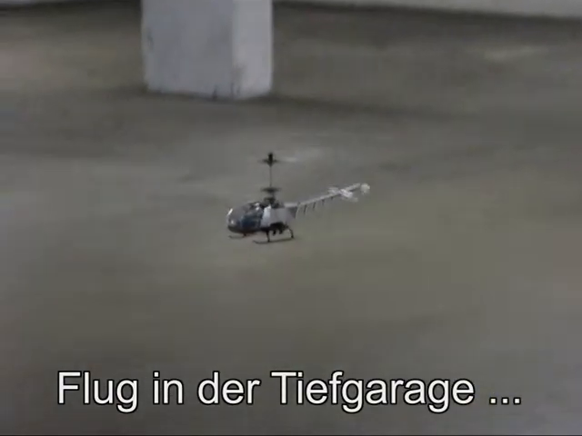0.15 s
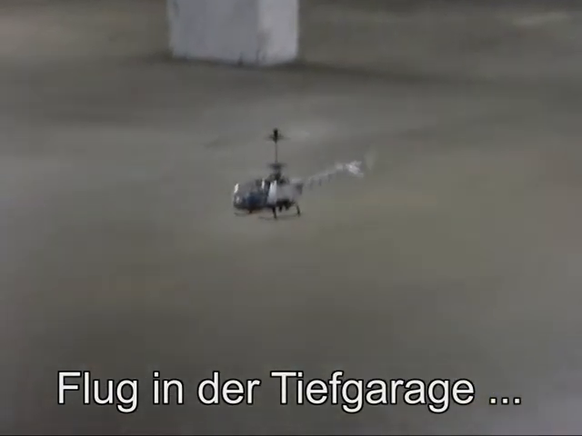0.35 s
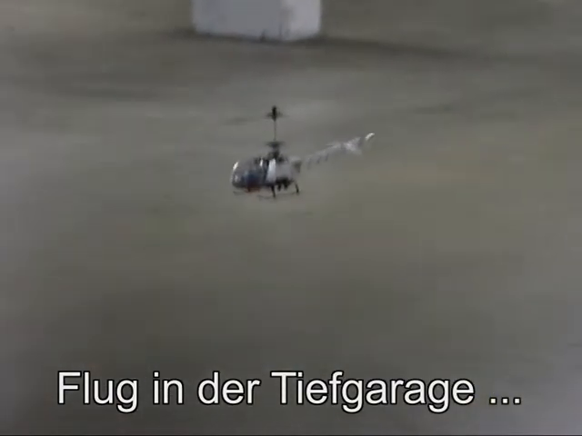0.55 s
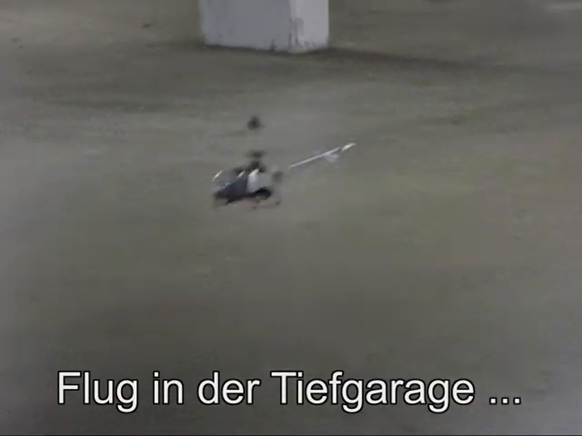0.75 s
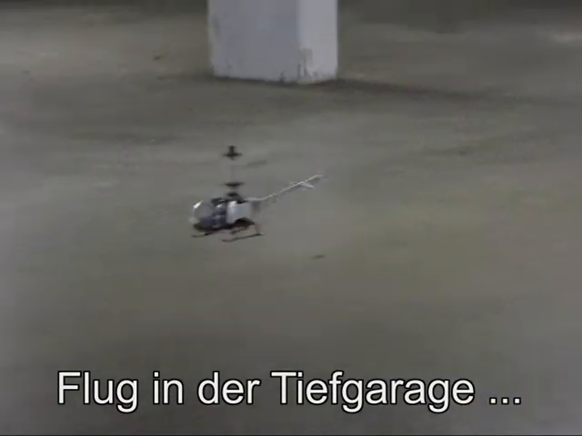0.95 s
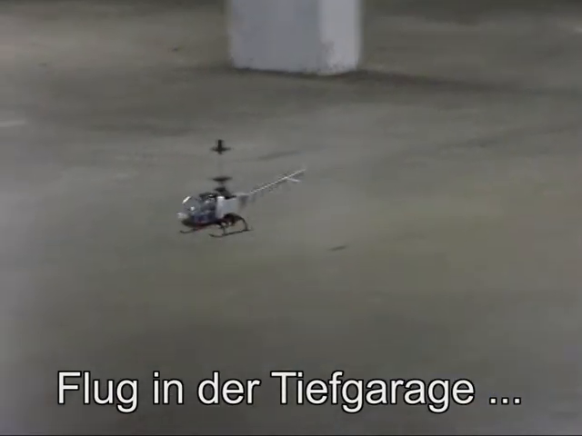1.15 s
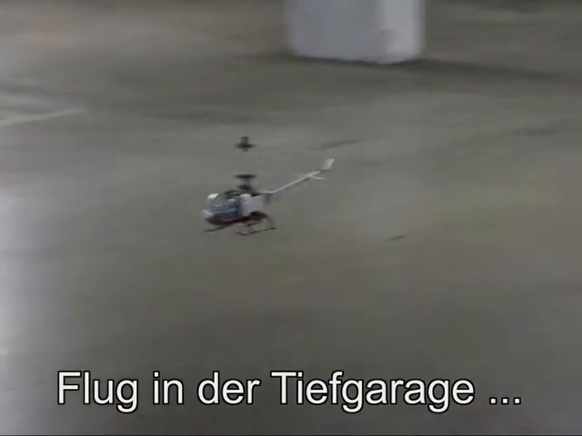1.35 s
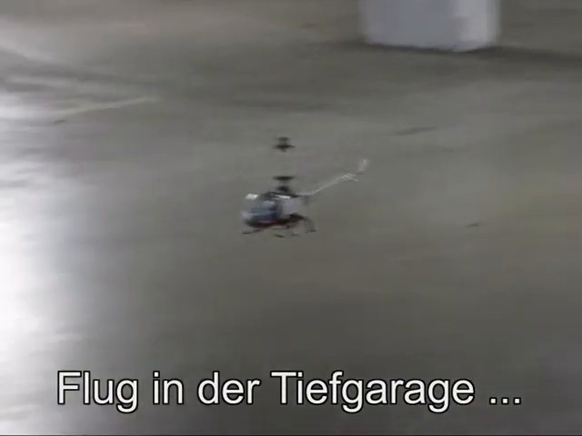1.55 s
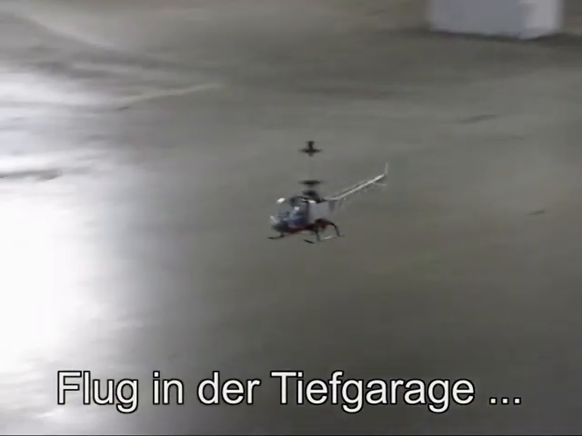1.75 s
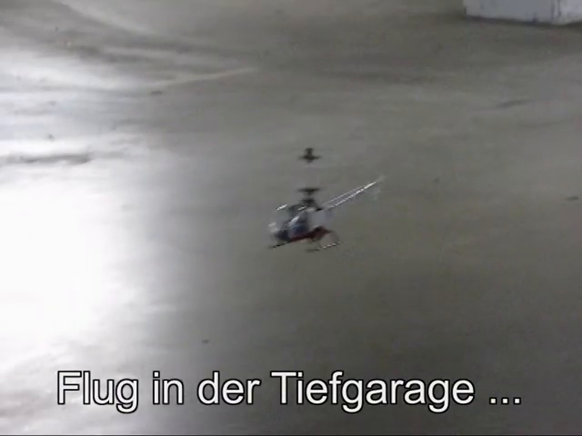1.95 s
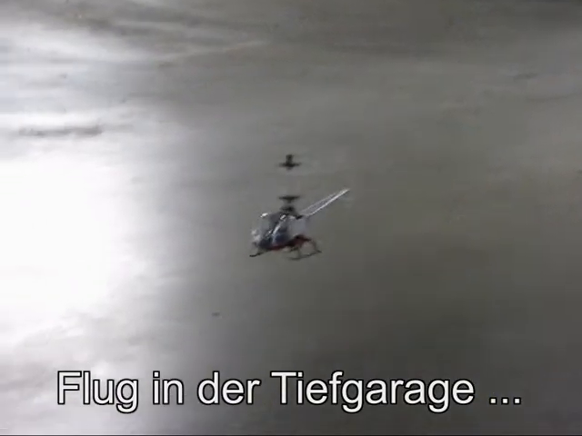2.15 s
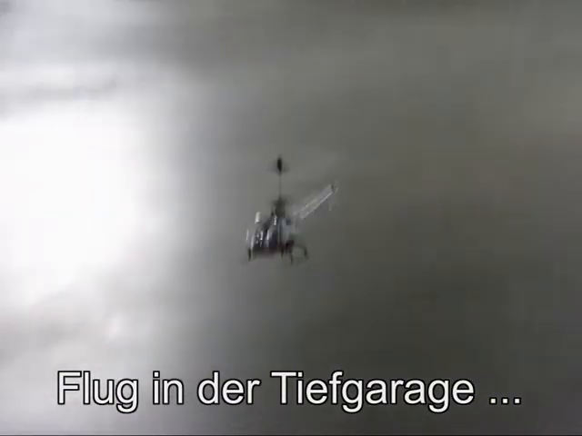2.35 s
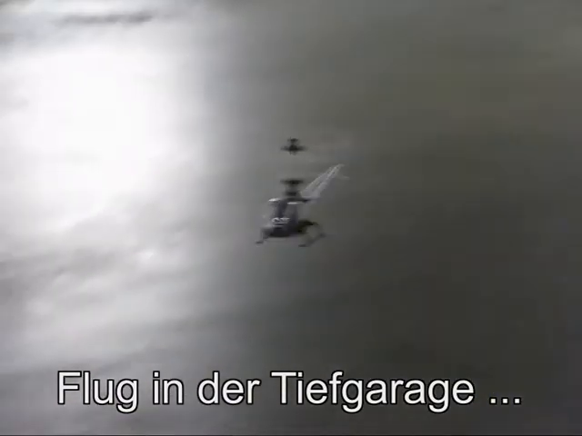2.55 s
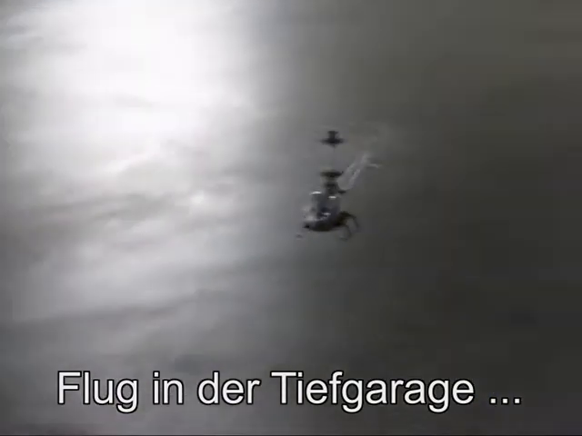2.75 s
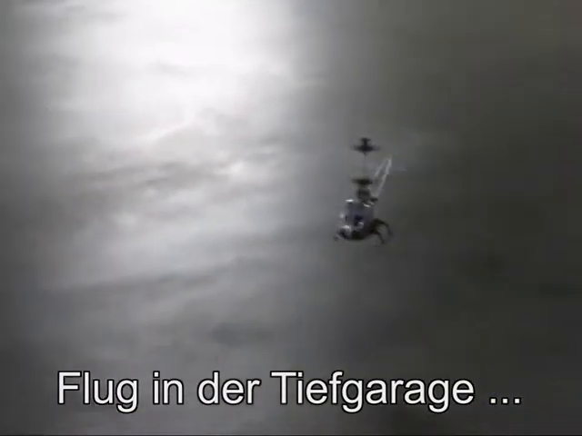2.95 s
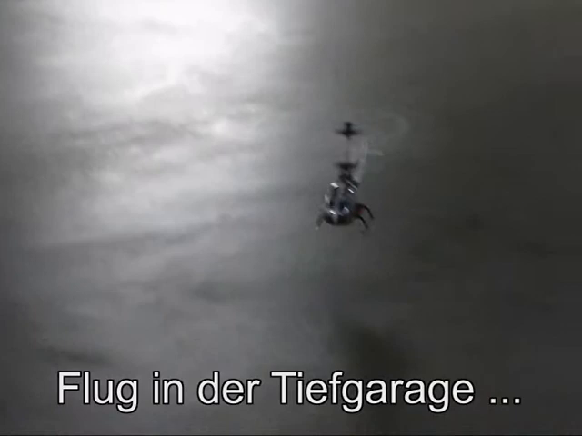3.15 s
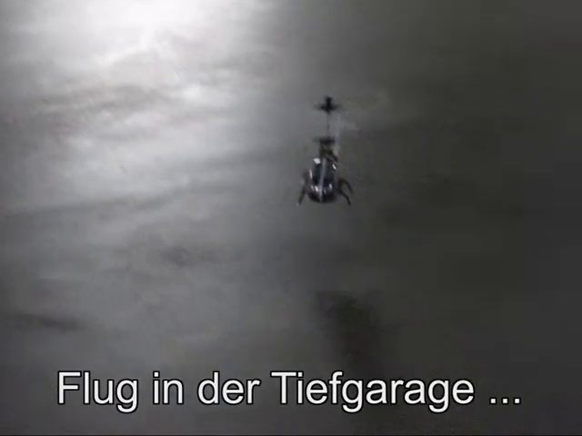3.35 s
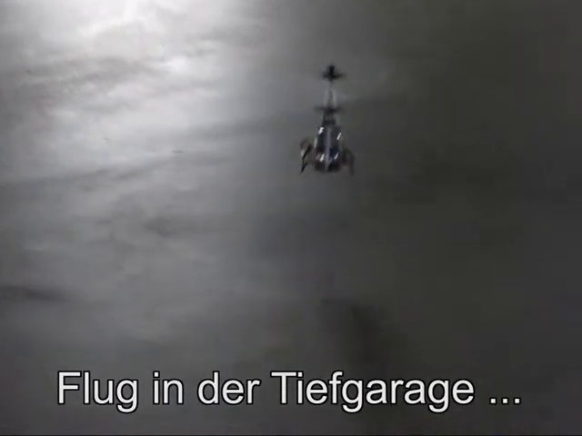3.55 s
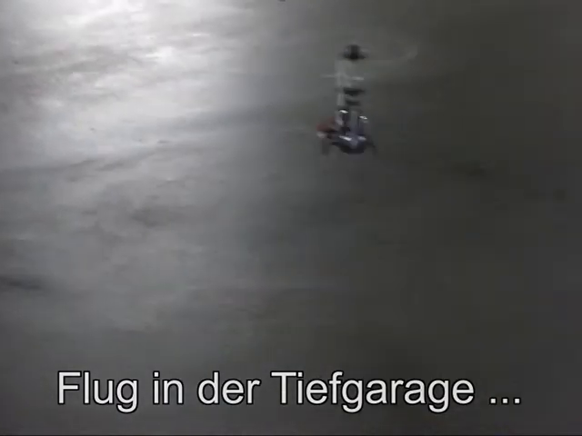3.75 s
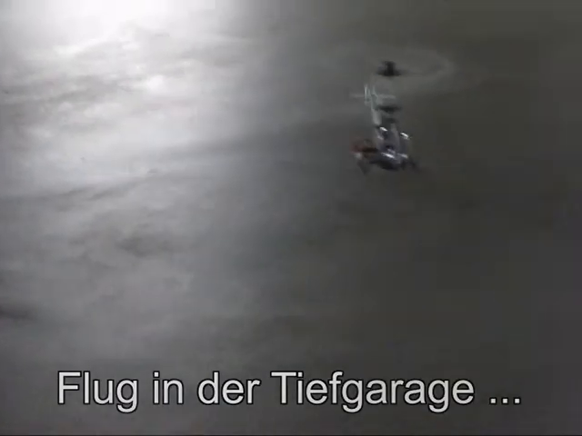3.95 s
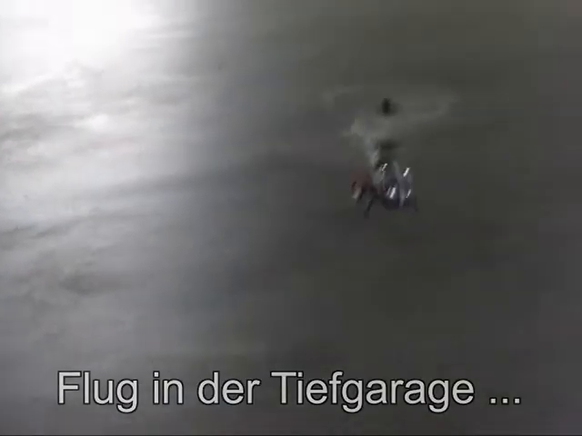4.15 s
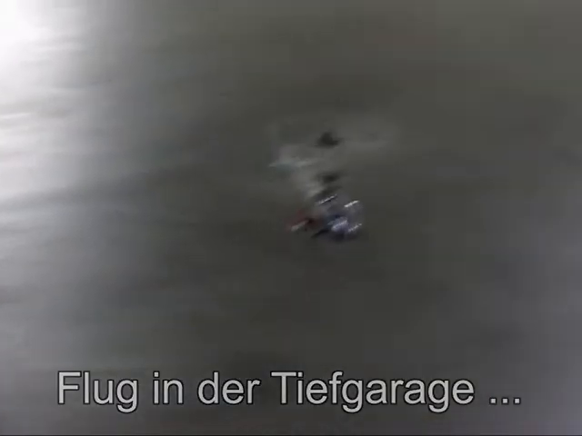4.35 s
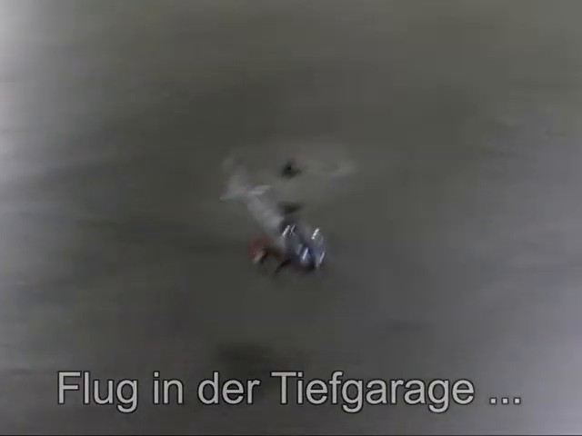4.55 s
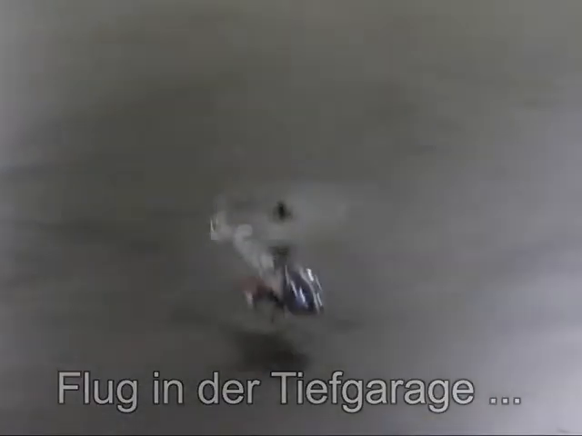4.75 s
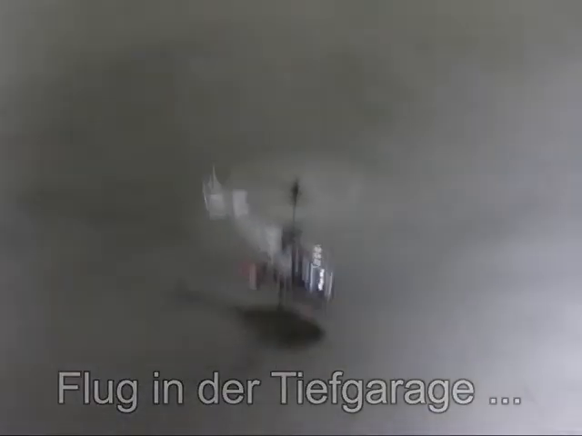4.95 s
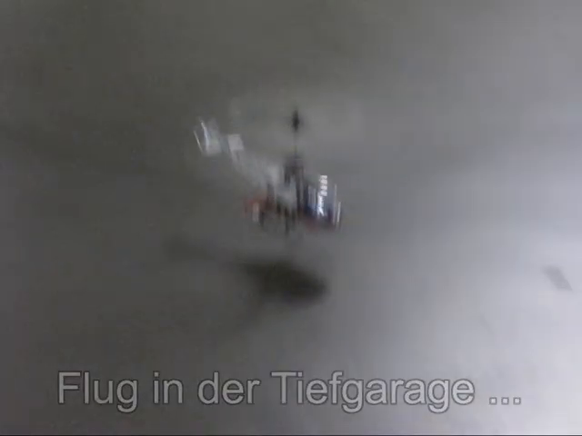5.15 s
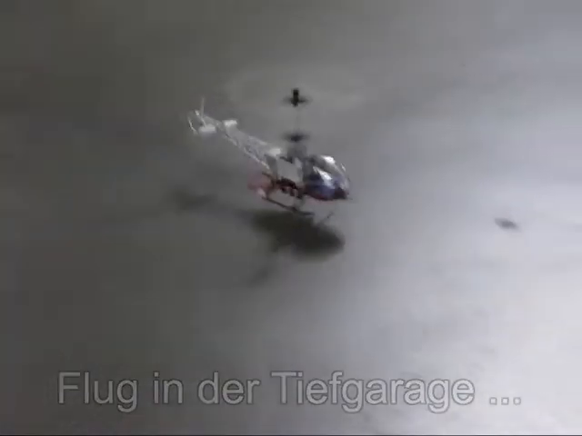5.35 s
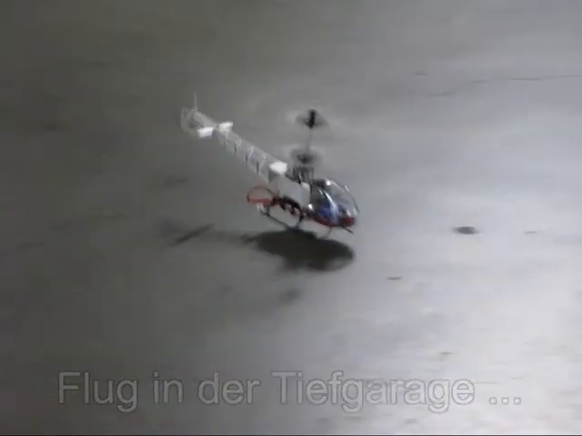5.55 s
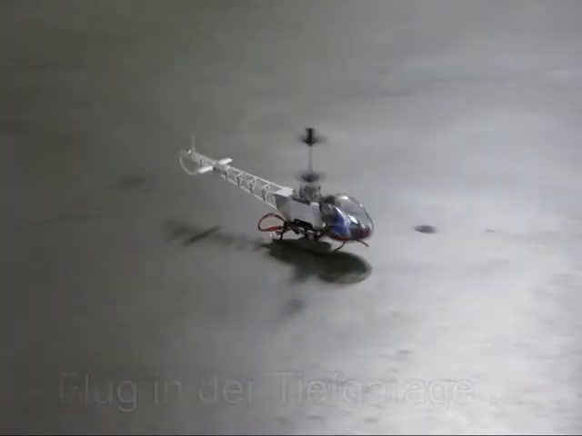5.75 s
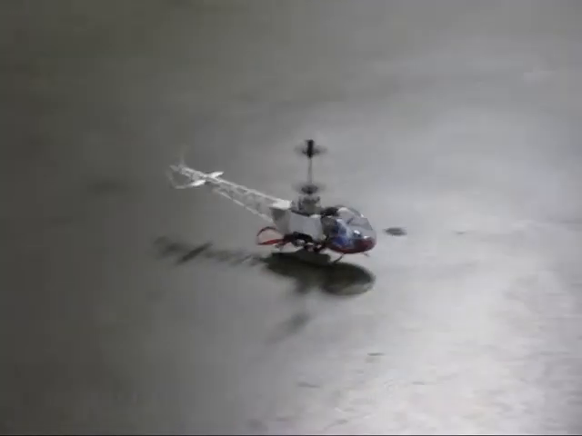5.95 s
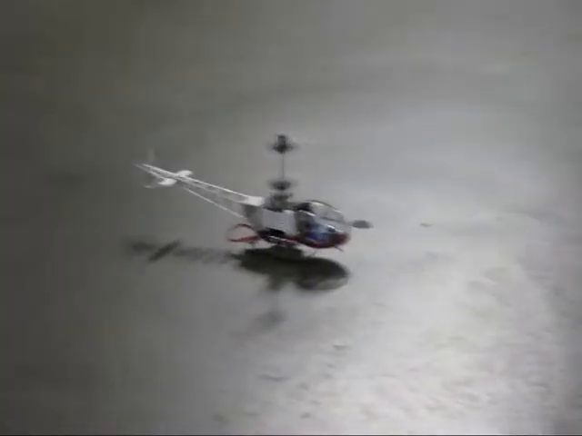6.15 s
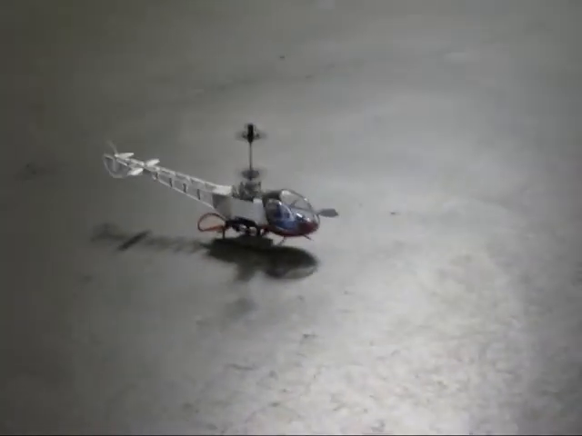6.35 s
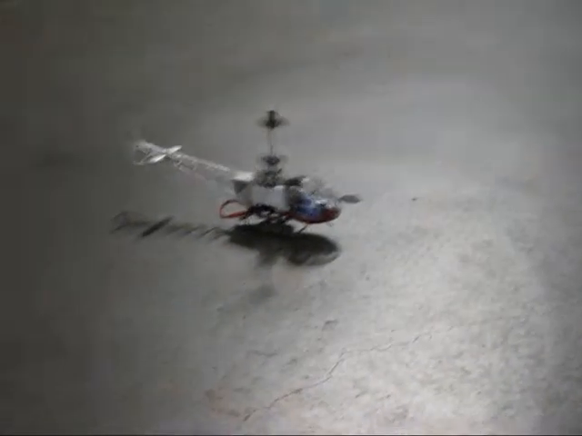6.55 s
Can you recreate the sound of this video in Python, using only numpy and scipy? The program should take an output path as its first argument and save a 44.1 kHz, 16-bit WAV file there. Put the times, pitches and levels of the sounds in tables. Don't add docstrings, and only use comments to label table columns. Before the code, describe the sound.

A toy-sized electric helicopter holds a steady, piercing, buzzing whine with rapid throbbing and a wide airy hiss, blurred by hard concrete echo. Small gusts and thin metallic ringing waver through it. It then descends, growing quieter and lower, touches down without a marked thump, and its motors wind down as everything fades out.

```python
import sys
import numpy as np
from scipy import signal
from scipy.fft import rfft, irfft, next_fast_len
from scipy.io import wavfile
from scipy.ndimage import uniform_filter1d, map_coordinates

SR = 44100
rng = np.random.default_rng(int(sys.argv[2]) if len(sys.argv) > 2 else 0)


def volts(x):
    e = np.asarray(x, float) / 20
    return 10 ** e


def to_wav(sig):
    pcm = np.clip(np.atleast_2d(sig), -1, 1) * 32767
    pcm = np.round(pcm).astype(np.int16)
    wavfile.write(sys.argv[1], SR, pcm.T)


N = 295029
TEETH = 8
HOVER_HZ = 2150

# t/s, tooth rate f/Hz, whine level over hiss/dB, second motor's offset f/Hz, its level over the first/dB
MOTOR_SPEEDS = [(0, 2188, 5.5, 96.9, -8), (.3, 2192, 2.5, 77.9, -6), (.72, 2193, 3.5, 72.1, -10.5),
                (.95, 2130, -0.5, 31.83, 4.5), (1.5, 2128, -3, 32.87, 3.5), (1.8, 2145, -0.5, 32.93, 0.5),
                (2.2, 2093, 2, 37.87, -6.5), (2.5, 2126, -2, 31.99, -2), (2.9, 2143, 2, 30.84, -4),
                (3.25, 2123, 1, 33, -2), (3.8, 2103, -0.5, 45.1, -8), (4.2, 2011, -5, 60.1, 4.5),
                (4.6, 2000, -6, 55.8, 2), (5.2, 1916, -2.5, 35, -11.5), (5.5, 1768, -4.5, 68.8, -7),
                (5.95, 1563, 1.5, 54.3, -4), (6.3, 1358, -9, 40, -3), (6.69, 1150, -19, 38, -4)]


def unit(x):
    return x / np.sqrt(np.mean(x ** 2) + 1e-20)


def along(points, hz):
    f, v = np.transpose(points)
    return np.interp(np.log(hz + 1), np.log(f + 1), v)


def curves(rows):
    s, *cols = np.transpose(rows)
    return [np.interp(np.arange(N) / SR, s, c) for c in cols]


def wobble(rate):
    return map_coordinates(rng.standard_normal(1200), [np.arange(N) * rate / SR], order=2)


def angle(hz):
    return 2 * np.pi * np.cumsum(hz) / SR


def flares(rows):
    t = np.arange(N) / SR
    return sum(db * np.cos(np.pi / 2 * np.clip((t - s) / half, -1, 1)) ** 2 for s, half, db in rows)


def of_order(rows, order):
    return [row[1:] for row in rows if round(row[0]) == round(order)]


def slowed():
    return np.clip(1 - curves(MOTOR_SPEEDS)[0] / HOVER_HZ, 0, 1)


def hall(x):
    # f/Hz, t60/s
    decay_times = [(200, 0.81), (2000, 2.8), (10000, 0.28)]
    hz, t, z = signal.stft(rng.standard_normal(SR), SR, nperseg=256)
    decay = volts(-60 * t / along(decay_times, hz)[:, None])
    tail = signal.istft(z * decay, SR, nperseg=256)[1]
    delayed = np.pad(x, (500, 0))
    return signal.fftconvolve(delayed, tail / np.linalg.norm(tail))[:N]


def bounce(x):
    # t/s, extra path/m
    extra_path = [
        (0, 0.26),
        (1, 0.34),
        (2, 0.3),
        (3, 0.31),
        (3.8, 0.34),
        (4.5, 0.3),
        (5.2, 0.217),
        (5.7, .17),
        (6.69, 0.1),
    ]
    late = np.arange(N) - curves(extra_path)[0] / 343 * SR
    return unit(x + 0.048 * map_coordinates(x, [late], mode="mirror"))


def rush(response, patchy_db):
    z = signal.stft(rng.standard_normal(N), nperseg=512)[2]

    def field(bins, frames):
        across = uniform_filter1d(rng.standard_normal(z.shape), bins, 0)
        return unit(uniform_filter1d(across, frames, 1))

    gain = volts(patchy_db * field(8, 12) + 1.1 * field(3, 110))
    x = signal.istft(z * gain, nperseg=512)[1][:N]
    m = next_fast_len(N)
    spectrum = rfft(x, m) * response(np.fft.rfftfreq(m, 1 / SR))
    return unit(irfft(spectrum, m)[:N])


def blade_hiss(turn):
    # f/Hz, level per Hz/dB
    hiss_spectrum = [(880, -48.5), (1500, -42), (2000, -10), (2300, -7), (2700, -13.5), (3200, -9),
                     (3840, -10.5), (4370, -9.5), (4920, -13.5), (6560, -14.5), (8500, -15.5), (12100, -19),
                     (15100, -25.5), (16500, -15)]
    # t/s, share of its side seen (0-1)
    side_seen = [
        (0, 0.97),
        (.6, 0.46),
        (1.9, 0.68),
        (3.1, 0.2),
        (4.7, 0.5),
        (5.3, 0.48),
        (6.69, .7),
    ]
    side_db, nose_db = 5, -0.5
    landed_s, dulls_db_per_s = 5.46, 5.5
    treble_db = nose_db + (side_db - nose_db) * curves(side_seen)[0]
    treble_db = treble_db - dulls_db_per_s * np.maximum(np.arange(N) / SR - landed_s, 0)

    def tip_share(hz):
        return 1 / (1 + (7000 / (hz + 1)) ** 4)

    tips = rush(lambda hz: volts(along(hiss_spectrum, hz)) * np.sqrt(tip_share(hz)), patchy_db=1.4)
    gears = rush(lambda hz: volts(along(hiss_spectrum, hz)) * np.sqrt(1 - tip_share(hz)), patchy_db=0.5)
    shaft = angle(curves(MOTOR_SPEEDS)[0] / TEETH + 30 * wobble(40))
    chop = 1 + 0.093 * np.sin(turn + 1.6 * wobble(9.3)) + 0.047 * np.sin(shaft)
    return unit(chop * (gears + volts(-3.0 + treble_db) * tips))


def downwash():
    # f/Hz, level per Hz/dB
    thrum_spectrum = [(18, -60.5), (30, -15), (123, -13.5), (242, -2), (302, -3.5), (431, -2), (616, -1),
                      (800, -3.5), (1040, -29), (1760, -120)]
    return rush(lambda hz: volts(along(thrum_spectrum, hz)) * hz ** 4 / (hz ** 4 + 52 ** 4), patchy_db=0.06)


def shell_rattle():
    # f/Hz, bandwidth/Hz, level/dB
    shell_modes = [(746, 230, -7.5), (991, 167, 2), (1704, 700, -5)]

    def shell(f):
        total = 0
        for k, (centre, width, db) in enumerate(shell_modes):
            mode = 1j * f * width / (centre * centre - f * f + 1j * f * width)
            total = total + (-1) ** k * volts(db) * mode
        return total

    return rush(lambda hz: shell(hz) * hz ** 2 / (hz ** 2 + 600 ** 2), patchy_db=0.7)


def air(turn):
    # t/s, half length/s, lift/dB
    gusts = [(.5, .08, -1), (1.5, 0.073, 0.5), (1.95, 0.05, 1), (2.2, 0.05, 0.5), (3.78, 0.045, 2),
             (2.35, 0.062, 2.5), (2.56, 0.047, 0), (2.78, 0.11, 1.5), (.3, 0.047, -0.8), (1.7, 0.067, 0),
             (3.85, 0.058, 0.5), (4.1, 0.054, 1.5)]
    thrum_db = -22.5 + 16.5 * slowed()
    rattle_db = -10.5 + 26 * slowed()
    flutter = flares(gusts) + 0.15 * wobble(6.1) + 0.48 * wobble(14) + 0.51 * wobble(25)
    hiss = bounce(blade_hiss(turn))
    thrum = volts(thrum_db - 2.5) * downwash()
    rattle = volts(rattle_db - 1.5) * shell_rattle()
    return volts(flutter - 0.22) * (hiss + thrum + rattle)


def strands():
    # start f/Hz, end f/Hz, start t/s, end t/s, level over hiss/dB
    faint_bands = [(7050, 6700, 0, 1.1, -12), (4730, 5800, -1, 1.3, -17), (2970, 2930, -0.5, 3.2, -20),
                   (7660, 8100, -0.5, 1.6, -16.5), (11900, 11800, 2, 4.4, -20.5),
                   (3130, 3070, 3.6, 4.6, -18), (2950, 3100, 3.3, 4.0, -21), (6360, 6450, 2.1, 4.4, -19),
                   (8680, 8500, 1, 3.8, -19), (8020, 7850, 4, 5.3, -17), (7400, 7300, 5.9, 6.3, -19),
                   (6000, 5900, 4.1, 4.8, -20), (995, 880, 4.4, 5.9, -22), (790, 680, 3.5, 5.75, -25),
                   (1060, 1050, 1, 3.5, -19), (1340, 1335, 2, 4, -24), (1992, 1985, -.2, .5, -20),
                   (2570, 2560, 3.9, 4.9, -21), (7300, 7200, 5.1, 5.8, -15)]
    t, out = np.arange(N) / SR, 0
    for from_hz, to_hz, start, end, db in faint_bands:
        smear_hz = .008 * from_hz + 187.4 / (1 + (5400 / from_hz) ** 8)
        part = np.clip((t - start) / (end - start), 0, 1)
        pitch = from_hz + (to_hz - from_hz) * part + smear_hz * wobble(120)
        swell = np.sqrt(np.abs(np.sin(np.pi * part)))
        out = out + volts(db + 4.5 + 2.6 * wobble(30)) * swell * np.sin(angle(pitch))
    return out


def blades(turn):
    # multiple of rotor speed, level over hiss/dB
    rotor_orders = [(4, -42), (6, -40.5), (8, -31.5), (12, -34.5)]
    # multiple of rotor speed, t/s, half length/s, lift/dB
    rotor_swells = [(4, .2, .2, 9), (4, .95, .5, 12), (4, 2.0, .15, 8), (6, .1, .5, 8), (6, 1.2, .6, 9),
                    (6, 2.2, .65, 13), (6, 3.7, .2, 5), (8, .3, .65, 12), (8, 1.0, .3, 6), (8, 1.38, .2, 9),
                    (8, 1.7, .18, 10), (8, 2.55, .3, 9), (8, 2.9, .12, 8), (8, 3.22, .15, 8),
                    (8, 3.8, .12, 9), (8, 4.25, .25, 12), (8, 4.65, .15, 8), (8, 5.0, .15, 9),
                    (12, .75, .2, 7), (12, 1.6, .3, 6), (12, 2.7, .2, 11), (12, 3.12, .2, 13),
                    (12, 3.72, .15, 11)]
    sag_db = 11 * slowed()
    out = 0
    for k, db in rotor_orders:
        level_db = db + flares(of_order(rotor_swells, k)) - sag_db
        out = out + volts(level_db - 3.0 + 1.2 * wobble(8.8)) * np.sin(round(k) * turn)
    return out


def clatter(shaft, top):
    knots = rng.standard_normal((60, 11))
    at = np.arange(N) * 9 / N
    out = 0
    for k in range(TEETH + 1, top):
        gain = np.interp(at, np.arange(10), volts(-25 - .15 * k + 4.5 * knots[k, :10]))
        out = out + gain * np.sin(k * shaft + 6 * knots[k, 10])
    return volts(-4.5) * out


def motor(tooth_hz, turn, sway, jitter_hz):
    # multiple of shaft speed, level re whine/dB
    steady_orders = [(6, -28.5), (7, -23), (15, -18), (16, -10), (17, -18), (24, -18.5), (32, -21)]
    # multiple of shaft speed, level re whine/dB
    low_orders = [(3, -35), (4, -28), (5, -30)]
    # multiple of shaft speed, t/s, half length/s, lift/dB
    shaft_swells = [(4, 3.81, 0.46, 13.5), (4, 4.686, 0.84, 14.5), (4, 6.05, 0.33, 14), (5, 0.091, 0.26, 5),
                    (5, 5, 0.69, 12), (5, 5.05, .4, 6), (5, 6.0, 0.31, 15), (16, 3.78, 0.43, 4.5),
                    (16, 4.75, 0.28, 4.5), (16, 5.57, 0.22, -1)]
    shaft = angle(tooth_hz + jitter_hz * wobble(60)) / TEETH
    shaft = shaft + sway / TEETH * (np.sin(turn) + 0.69 * np.sin(2 * turn + 1.22))
    orders = [(TEETH, 0)]
    for k, db in low_orders:
        third_db = 3.5 if round(k) == 3 else 0
        orders.append((round(k), db + flares(of_order(shaft_swells, k)) + third_db))
    for k, db in steady_orders:
        orders.append((k, db + flares(of_order(shaft_swells, k))))
    blur = .045 * wobble(150)
    load = volts(0.68 * wobble(12)) * (1 + 0.36 * np.sin(turn + 0.63))
    tones = 0
    for k, db in orders:
        phase = k * shaft + max(k - TEETH, 0) * blur + rng.uniform(0, 2 * np.pi)
        tones = tones + volts(db) * np.sin(phase)
    return load * tones + clatter(shaft, top=60)


def drive(turn):
    tooth_hz, whine_db, split_hz, second_db = curves(MOTOR_SPEEDS)
    first = motor(tooth_hz, turn, sway=0.59, jitter_hz=2.59)
    second = motor(tooth_hz + split_hz, 1.02 * turn, sway=0.53, jitter_hz=2.62)
    return volts(whine_db + 1.57) * (first + volts(second_db) * second)


def scene():
    # t/s, level/dB
    hiss_level = [
        (0, -23),
        (.1, -22),
        (1.8, -20.5),
        (2.8, -20.5),
        (3.4, -21.5),
        (4.0, -22.5),
        (4.9, -25),
        (5.6, -29.5),
        (6.1, -31),
        (6.69, -34.5),
    ]
    gear_teeth = 68.3
    coast = .3
    tooth_hz = curves(MOTOR_SPEEDS)[0]
    turn = angle((tooth_hz + coast * HOVER_HZ * slowed()) / gear_teeth)
    tones = drive(turn) + strands()
    fade_s, steepness, silent_s = 1.08, 1.124, .02
    left_s = (N - np.arange(N)) / SR
    fade = np.clip((left_s - silent_s) / fade_s, 0, 1) ** steepness
    mix = volts(-2.5) * tones + volts(-9.5) * hall(tones) + blades(turn) + air(turn)
    mono = fade * volts(curves(hiss_level)[0]) * mix
    return np.array([mono, mono])


def roll_off(x):
    return signal.sosfilt(signal.butter(12, 16290, fs=SR, output="sos"), x)


def record(dry):
    # start t/s, top f/Hz
    band_steps = [(0, 15740), (5.02, 15070), (6.19, 14380), (6.5, 13700)]
    hz, t, z = signal.stft(dry, SR, nperseg=1024)
    s, top_hz = np.transpose(band_steps)
    kept = hz[:, None] < top_hz[np.searchsorted(s, t, side="right") - 1]
    mix = signal.istft(z * kept, SR, nperseg=1024)[1][:, :N]
    return roll_off(mix)


dry = scene()
out = record(dry)
to_wav(out)
```